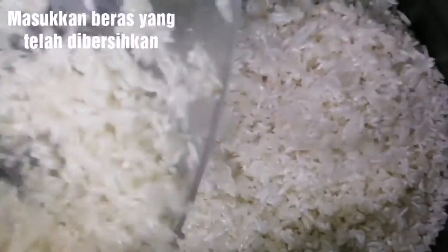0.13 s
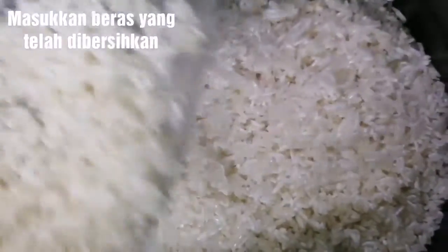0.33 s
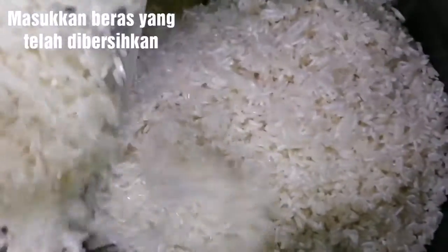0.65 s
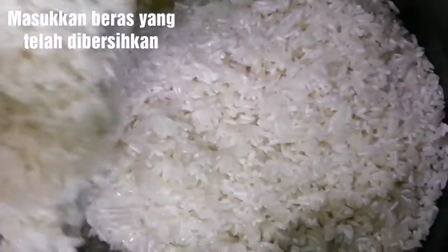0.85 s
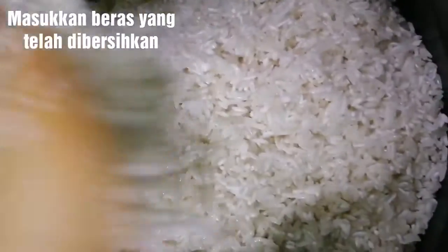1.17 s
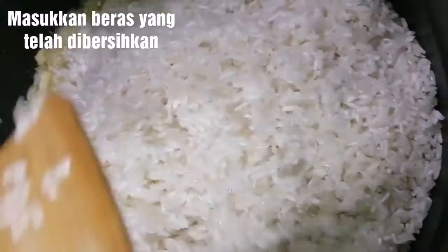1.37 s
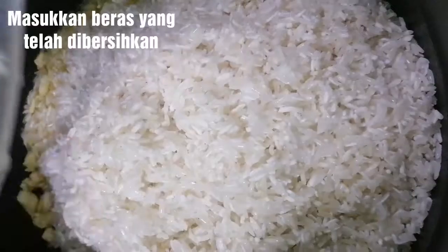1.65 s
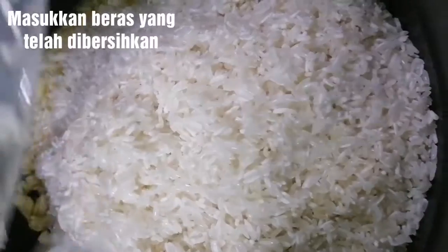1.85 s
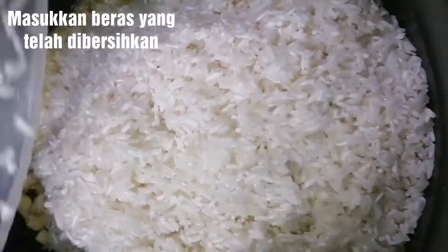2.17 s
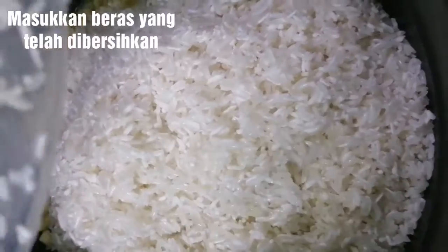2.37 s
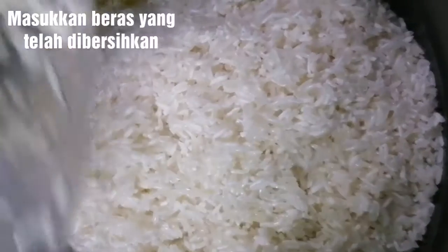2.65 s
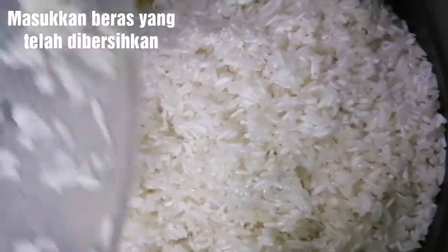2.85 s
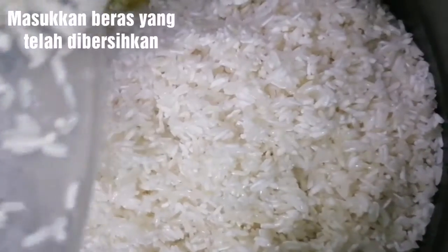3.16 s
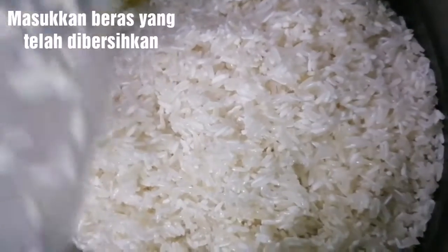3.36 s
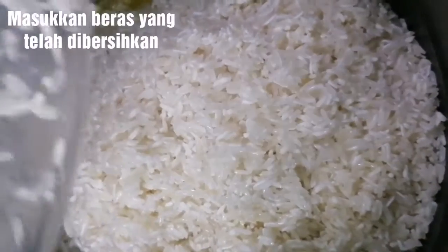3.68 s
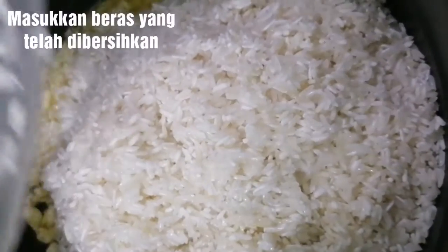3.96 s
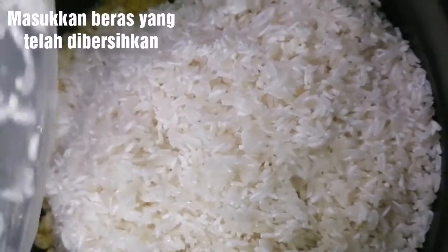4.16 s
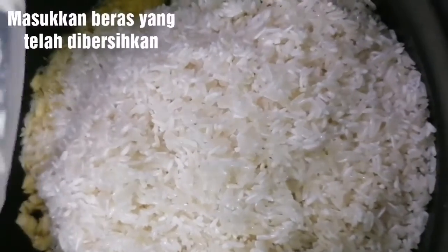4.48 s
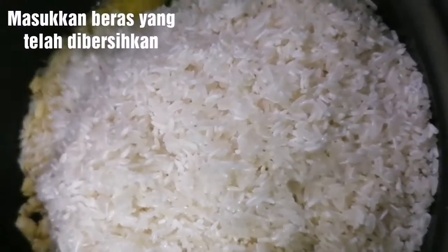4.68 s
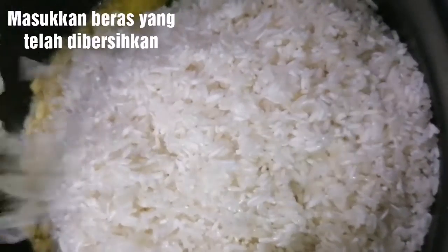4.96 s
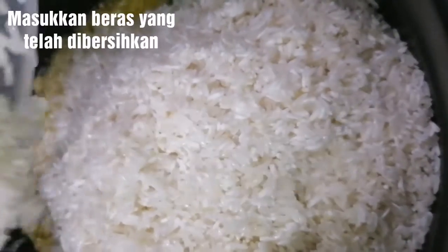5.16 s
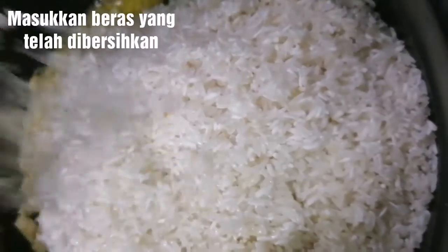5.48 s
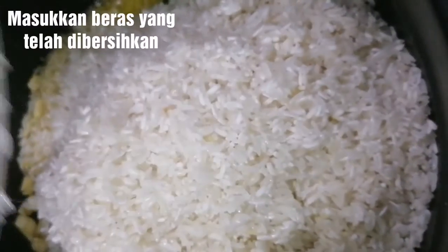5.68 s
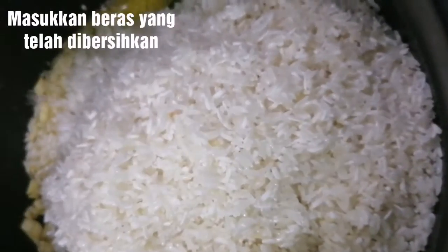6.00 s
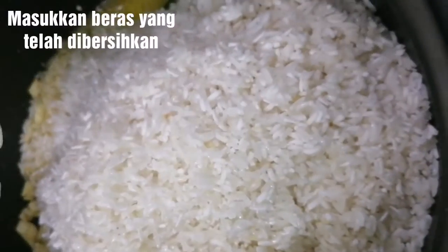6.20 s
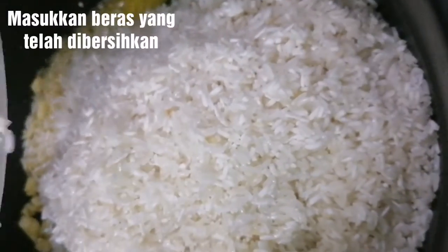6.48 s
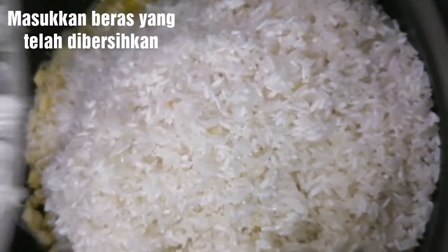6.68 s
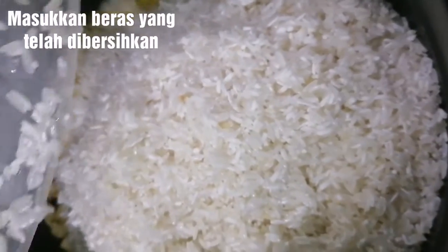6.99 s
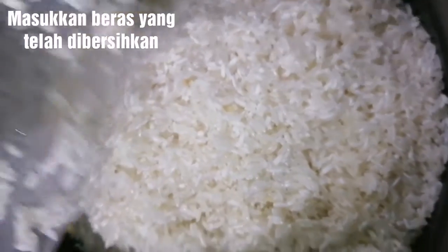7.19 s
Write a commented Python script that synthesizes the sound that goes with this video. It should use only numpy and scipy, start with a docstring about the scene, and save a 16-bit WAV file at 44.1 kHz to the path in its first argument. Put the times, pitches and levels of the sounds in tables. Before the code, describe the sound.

Very close stereo pickup in a small kitchen. Rice is pushed from a plastic container into a pot in short hissing showers, densest in the first second and a half and again around three to four seconds. A wooden paddle knocks the hollow plastic throughout, with dull thuds, crunching grains and sharp single ticks. A faint low hum sits underneath.

```python
"""In a small kitchen with a faint hum, rice is pushed from a plastic container into a pot, close to a phone.
Each push is a shower of grain clicks that swells and ebbs: hiss on the heap, rasp and drumming on plastic.
Stray grains and snapping creases tick as short bursts; the wooden paddle skids through grains and squeaks.
Its knocks ring decaying modes of container and paddle, crunch grains, and make the load thud, slump and spill."""
import sys
import numpy as np
from scipy import signal
from scipy.fft import rfft, irfft
from scipy.io import wavfile

SR = 44100
rng = np.random.default_rng(int(sys.argv[2]) if len(sys.argv) > 2 else 0)


def log_audio(samples):
    """Write samples as a 16-bit WAV file to the path given in sys.argv[1]."""
    # one column per channel
    frames = np.atleast_2d(samples).T
    # limit to full scale, then quantise
    limited = np.clip(frames, -1, 1)
    pcm = np.round(limited * 32767).astype(np.int16)
    wavfile.write(sys.argv[1], SR, pcm)


N = 323694
TIME = np.arange(N) / SR


def undb(db):
    """Decibels to amplitude."""
    return 10 ** (np.asarray(db) / 20)


def unit(x):
    """Scale to an rms of 1."""
    return x / np.sqrt(np.mean(x ** 2))


def gains(points, size):
    """Amplitude at each FFT bin, interpolated from (freq_hz, gain_db) over log frequency."""
    hz, db = np.transpose(points)
    bins_hz = np.arange(size // 2 + 1) * SR / size
    return undb(np.interp(np.log(bins_hz + 1), np.log(hz), db))


def colour(x, points, size=1024):
    """Causal minimum-phase filter of unit energy, shaped by (freq_hz, gain_db)."""
    cepstrum = irfft(np.log(gains(points, size)))
    cepstrum[1:size // 2] *= 2
    cepstrum[size // 2 + 1:] = 0
    response = irfft(np.exp(rfft(cepstrum)))
    response = response / np.linalg.norm(response)
    return signal.oaconvolve(x, response[None], axes=1)[:, :N]


def cut(x, hz, kind, order=4):
    """Butterworth filter."""
    return signal.sosfilt(signal.butter(order, hz, kind, fs=SR, output="sos"), x)


def fade(t60_s, size):
    """Exponential decay, 60 dB down after t60_s."""
    return np.exp(-np.log(1000) * TIME[:size] / t60_s)


def surge(rise_s, size):
    """Pulse that peaks at 1 after rise_s, then decays."""
    t = TIME[:size] / rise_s
    return t * np.exp(1 - t)


def add(out, s, sound):
    """Lay a sound into the track at time s."""
    i = max(int(s * SR), 0)
    out[:, i:i + sound.shape[1]] += sound[:, :N - i]


def wander(hz):
    """Random fluctuation of rms 1: noise low-passed at hz."""
    return unit(cut(rng.standard_normal(N), hz, "low", order=2))


def ports(x, lag_samples):
    """The right port hears the sound lag_samples after the left."""
    return np.array([x, np.pad(x, (lag_samples, 0))[:len(x)]])


def click(t60_s, shared, scatter_t60_s=0.032, tone=1.46, size=1024):
    """One contact: a faintly pitched snap, left port first, plus diffuse scatter off the pot wall."""
    ping = np.sin(2 * np.pi * rng.uniform(1600, 11000) * TIME[:size])
    snap = unit((rng.standard_normal(size) + tone * unit(ping)) * fade(t60_s, size))
    lag_samples = int(rng.uniform(13, 23))
    scatter = unit(rng.standard_normal((2, size)) * fade(scatter_t60_s, size))
    # shared: power fraction of the snap
    mix = np.sqrt(shared) * ports(snap, lag_samples) + np.sqrt(1 - shared) * scatter
    return mix / np.sqrt(size)


def patter(per_s, spread_db, shared=0.74, count=24, scatter_t60_s=0.027):
    """Random impacts of count kinds; rate does not set power, positive spread makes a few much harder."""
    out = 0
    for _ in range(count):
        chance, strength = rng.random((2, N))
        force = undb(-spread_db * np.log(0.033 + strength)) / np.sqrt(per_s)
        hits = (chance < per_s / count / SR) * force
        out = out + signal.oaconvolve(hits[None], click(0.0014, shared, scatter_t60_s), axes=1)[:, :N]
    return unit(out)


def ring(modes, stretch, detune=0.028, uneven_db=7.5, size=8192):
    """Decaying modes, peak 1; every contact point shifts and weights the weaker ones anew."""
    out, top_db = 0, max(db for _, _, db in modes)
    for hz, t60_s, db in modes:
        shift, weight = rng.standard_normal(2) * (db < top_db)
        phase = 2 * np.pi * hz * stretch * (1 + detune * shift) * TIME[:size]
        out = out + undb(db + uneven_db * weight) * fade(t60_s, size) * np.sin(phase)
    return out / np.abs(out).max()


# kitchen noise colour: freq_hz, gain_db (relative)
KITCHEN_COLOUR = [(25, -14), (42, 1), (50, 5), (62, -4), (115, 1.5), (147, 1), (185, -5.5), (300, -10.5),
                  (700, -11.5), (1500, -14), (3000, -20), (5000, -25.5), (9000, -22), (16000, -34)]
# kitchen hum lines: mean_pitch_hz, level_db (rms once grown, before waver)
HUM_LINES = [(48.4, -61.5), (145.3, -63)]


def kitchen(floor_db=-59, apart=0.49, waver_db=2, swell_db=6, hum_drift=0.01426, hum_waver_db=3.5):
    """Wavering hum and a low drone common to both ports, growing midway, with thin separate hiss."""
    noise = rng.standard_normal((3, N))
    growth_db = np.interp(TIME, [3.2, 3.7], [-swell_db, 0])
    drone = cut(noise[0], 170, "low", order=1) * undb(waver_db * wander(7.3) + growth_db)
    hiss = apart * noise[1:]
    air = unit(irfft(rfft(drone + hiss) * gains(KITCHEN_COLOUR, N), N))
    hum = 0
    for hz, db in HUM_LINES:
        level = undb(db + growth_db + hum_waver_db * wander(3.3)) * np.sqrt(2)
        pitch_hz = hz * (1 + hum_drift * wander(3.3))
        hum = hum + level * np.sin(2 * np.pi * np.cumsum(pitch_hz) / SR)
    return undb(floor_db) * air + hum


SHOWER_DEPTH_DB, SHOWER_ROUND = 20.5, 1.2  # drop one swell or ebb from the peak; higher exponent rounds crest


def shower(peak_s, swell_s, ebb_s):
    """Flow of one shower: the rice gathers speed, crests and runs out."""
    away = np.maximum((peak_s - TIME) / swell_s, (TIME - peak_s) / ebb_s)
    flow, near = np.zeros(N), away < 3
    flow[near] = undb(-SHOWER_DEPTH_DB * away[near] ** SHOWER_ROUND)
    return flow


# rice over the rim at each push: peak_s, swell_s, ebb_s, hiss_db, rasp_db, drum_db (relative)
SHOWERS = [(0.21, 0.1, 0.12, -36, -40.5, -43), (0.561, 0.02, 0.06, -32.5, -34, -49.5),
           (0.841, 0.077, 1, -47, -70, -48), (0.992, 0.096, 0.07, -35.5, -42.5, -44),
           (1.221, 0.14, 0.46, -45, -47.5, -54), (1.32, 0.062, 0.12, -36.5, -58, -65),
           (1.941, 0.029, 0.21, -45, -50, -53), (2.099, 0.18, 0.087, -42.5, -43.5, -58),
           (2.29, 0.46, 0.12, -50.5, -61, -85.5), (2.482, 0.05, 0.14, -41, -50.5, -46),
           (2.56, 0.1, 1, -52.5, -60, -76), (2.811, 0.12, 0.041, -54, -76, -47.5),
           (3.178, 0.098, 0.12, -37, -41, -47), (3.497, 0.081, 0.15, -34.5, -40, -40),
           (3.679, 0.073, 0.11, -49, -47, -69), (3.916, 0.013, 0.089, -32.5, -49, -39.5),
           (3.983, 0.11, 0.057, -36, -37.5, -42), (4.248, 0.041, 0.2, -40, -48, -42.5),
           (4.37, 0.09, 0.051, -46, -50, -53), (4.571, 0.049, 0.019, -48, -50.5, -55),
           (4.759, 0.33, 0.28, -50, -55.5, -52), (4.986, 0.076, 0.13, -44, -49.5, -61),
           (5.362, 0.059, 0.047, -43.5, -50.5, -38), (5.488, 0.13, 0.1, -41, -43, -49.5),
           (5.721, 0.2, 0.079, -50.5, -77, -89), (5.858, 0.0076, 0.023, -42.5, -37, -58.5),
           (5.999, 0.14, 0.092, -41.5, -44, -55.5), (6.235, 0.036, 0.099, -44.5, -45, -64),
           (6.426, 0.1, 0.11, -39.5, -43.5, -66), (6.678, 0.051, 0.25, -45, -49, -87),
           (7.041, 0.13, 0.088, -48, -54.5, -67), (7.27, 0.11, 0.094, -52, -62, -57)]
# heap settling between pushes: hiss_db, rasp_db, drum_db (relative)
SETTLING_DB = (-73, -77.5, -77.5)
# spill shaken loose by a knock, against its high clack: hiss_db, rasp_db, drum_db
SPILL_DB = (-13, -18.5, -27)
SPILL_LAG_S, SPILL_SWELL_S, SPILL_EBB_S = 0.012, 0.004, 0.052


def flows():
    """Strength of hiss, rasp and drumming: showers, spills and settling add up in power."""
    power = np.outer(undb(SETTLING_DB) ** 2, np.ones(N))
    for peak_s, swell_s, ebb_s, *levels_db in SHOWERS:
        power += np.outer(undb(levels_db) ** 2, shower(peak_s, swell_s, ebb_s) ** 2)
    spills = np.zeros(N)
    for s, *_, clack_db in KNOCKS:
        spill = shower(s + SPILL_LAG_S, SPILL_SWELL_S, SPILL_EBB_S)
        spills += (undb(clack_db) * spill) ** 2
    return np.sqrt(power + np.outer(undb(SPILL_DB) ** 2, spills))


# grain click colour: freq_hz, gain_db (relative)
GRAIN_COLOUR = [(300, -21), (800, -6), (1250, -3), (1500, -3.5), (1800, 6), (2400, 2), (3100, 7.5),
                (3950, -5.5), (5000, 3.5), (5800, 5), (7500, -0.5), (8900, 6.5), (11000, -2), (13000, -5),
                (15700, -12.5)]
# drummed container wall colour: freq_hz, gain_db (relative)
WALL_COLOUR = [(40, -50), (220, -9), (370, -7), (480, -8.5), (600, 5.5), (720, -4.5), (950, -13.5),
               (1220, -2.5), (1500, -20), (1780, -16), (2200, -34), (3000, -39.5)]


def stream(hiss_db=0, rasp_db=1, drum_db=0, split_hz=4200, trickle_per_s=550, rush_per_s=5500):
    """Grains fall on the heap, rasp along the plastic and set its wall drumming."""
    hiss, rasp, drum = flows()
    # a thin trickle ticks grain by grain; a full rush merges into a hiss
    per_s = trickle_per_s + rush_per_s * hiss / hiss.max()

    def grains():
        hits = patter(per_s / 2, spread_db=8.0, shared=0.13, count=18, scatter_t60_s=0.035)
        return colour(hits, GRAIN_COLOUR)

    # square hits sound in both ranges, glancing ones only bright, those on plastic only dull
    square, glancing, soft = grains(), grains(), grains()
    bright = unit(cut(square + 0.58 * glancing, split_hz, "high"))
    dull = unit(cut(square + 1.9 * soft, split_hz, "low"))
    # whole clumps bump the wall
    wall = unit(colour(patter(per_s=900, spread_db=3.5, shared=0.64, count=6), WALL_COLOUR))
    return undb(hiss_db) * hiss * bright + undb(rasp_db) * rasp * dull + undb(drum_db) * drum * wall


def clumping(clump_db=0.87, clump_hz=55):
    """Rice leaves the rim in clumps, so the flow flutters quickly."""
    return undb(clump_db * wander(clump_hz))


def strays(stray_db=-23, per_s=18, follow=0.35):
    """Grains bounce clear of the stream and tick on their own, harder when the flow is strong."""
    hiss = flows()[0]
    hits = colour(patter(per_s, spread_db=6, shared=0.96, count=12), GRAIN_COLOUR)
    chatter = unit(cut(hits, 2100, "high", order=2))
    return undb(stray_db) * hiss.max() * (hiss / hiss.max()) ** follow * chatter


# single grains and creases snapping: start_s, top_treble_db, lower_treble_db (relative)
TICKS = [(0.0227, -36.5, -44.5), (0.062, -30.5, -33.5), (0.2827, -40, -43), (0.3222, -38, -36),
         (0.4706, -34, -37), (0.6235, -44, -42), (0.685, -41, -41.5), (0.708, -34, -42),
         (1.061, -32.5, -39), (1.091, -39, -33.5), (1.602, -39.5, -47.5), (1.634, -36, -48),
         (1.695, -45.5, -62), (1.957, -34.5, -38), (1.9965, -33, -64), (2.0227, -37, -55),
         (2.059, -31.5, -37.5), (2.147, -32.5, -46), (2.552, -31, -33.5), (2.5778, -33, -35.5),
         (2.812, -40, -53), (3.174, -39, -33), (3.184, -39, -56),  (3.375, -41, -44), (3.407, -36.5, -36),
         (3.5546, -30, -67), (3.6157, -37.5, -64), (3.639, -38, -63), (3.672, -38, -46),
         (3.7214, -41.5, -43), (3.8187, -35.5, -40), (3.895, -32, -34), (4.154, -46.5, -42.5),
         (4.291, -29, -37), (4.363, -30, -39.5), (4.3958, -37, -40), (4.624, -37.5, -36), (4.68, -36, -60),
         (5.102, -46.5, -67), (5.169, -42, -54), (5.339, -36, -60), (5.362, -29, -58), (5.749, -36, -38),
         (6.061, -34, -41), (6.109, -41.5, -54.5), (6.162, -37, -40.5), (6.548, -44.5, -46),
         (6.629, -40.5, -30.5), (6.709, -33, -41), (6.7684, -44, -58), (6.8035, -39.5, -50),
         (6.8559, -41, -60), (6.8839, -39, -31), (7.0167, -41, -42.5), (7.173, -37.5, -70)]


def ticks(top_gain_db=23, lower_gain_db=25, split_hz=4200, bounce_db=-6):
    """Sharp single contacts, each a noisy decaying click with a weaker rebound."""
    bright, dull = np.zeros((2, 2, N))
    for s, top_db, lower_db in TICKS:
        rebound_s = rng.uniform(0.00061, 0.006)
        for delay_s, drop_db in ((0, 0), (rebound_s, bounce_db)):
            sound = click(0.012, 0.35, scatter_t60_s=0.016, tone=0.7) * undb(drop_db)
            add(bright, s + delay_s, sound * undb(top_db + top_gain_db))
            add(dull, s + delay_s, sound * undb(lower_db + lower_gain_db))
    top = cut(colour(bright, GRAIN_COLOUR), split_hz, "high")
    return top + cut(colour(dull, GRAIN_COLOUR), split_hz, "low")


# paddle modes: pitch_hz, t60_s, level_db (nominal, relative)
PADDLE_MODES = [(1231, 0.027, 0), (1784, 0.016, 24), (1950, 0.018, -11), (2500, 0.042, 8),
                (2790, 0.013, 6.5), (3010, 0.06, -7)]
# bounds of the low, middle and high clack: edge_hz
CLACK_EDGES_HZ = (900, 1480, 2250, 3600)


def struck_paddle(levels_db):
    """The point of contact decides how hard the paddle's low, middle and high modes ring."""
    out = 0
    for db, low_hz, high_hz in zip(levels_db, CLACK_EDGES_HZ, CLACK_EDGES_HZ[1:]):
        modes = [mode for mode in PADDLE_MODES if low_hz < mode[0] < high_hz]
        stretch = 1 + 0.0051 * rng.standard_normal()
        out = out + undb(db) * unit(ring(modes, stretch, detune=0.027, uneven_db=14))
    return out


# paddle against container: start_s, ring_db, ring_pitch_hz, thud_db, thud_pitch_hz,
# low_clack_db, middle_clack_db, high_clack_db (levels relative)
KNOCKS = [(0.057, -35.5, 575, -48.5, 134, -44, -61, -35), (0.483, -31, 573, -58, 240, -42, -37, -33.5),
          (0.795, -24, 560, -66, 423, -65, -68.5, -45.5), (0.806, -26, 580, -23.5, 385, -64, -68, -44),
          (0.921, -50, 590, -33.5, 97, -66, -73, -69), (1.016, -57.5, 586, -39.5, 348, -53, -58, -52),
          (1.308, -41, 583, -40, 224, -47, -41, -40), (1.373, -31.5, 635, -31, 156, -52, -54, -56),
          (1.381, -38, 567, -31.5, 137, -52, -47, -50), (1.883, -24.5, 603, -26.5, 170, -39, -40, -25),
          (1.947, -34.5, 628, -41, 288, -43, -40, -45), (2.342, -21.5, 616, -35, 190, -41, -62, -42.5),
          (2.435, -25.5, 583, -28.5, 346, -35.5, -30, -45.5), (2.514, -50.5, 610, -36, 119, -69, -67, -60),
          (2.996, -25, 577, -30, 261, -63, -52, -38.5), (3.007, -14.5, 595, -23.5, 290, -23.5, -22, -30.5),
          (3.091, -34.5, 654, -37, 363, -55, -69, -58), (3.392, -27.5, 517, -27.5, 338, -47, -41, -39),
          (3.416, -22, 585, -24.5, 264, -41.5, -51, -36), (3.818, -33, 620, -43, 159, -57, -49, -40.5),
          (3.905, -29.5, 575, -65, 300, -56, -58, -45), (3.958, -32.5, 606, -35.5, 360, -42, -33, -47),
          (4.209, -23, 618, -26.5, 227, -34, -39, -53), (4.231, -35, 607, -22.5, 151, -50, -55, -61),
          (4.254, -37, 635, -35, 230, -55, -45, -51), (4.296, -13, 602, -29, 217, -55, -37, -39.5),
          (4.302, -18.5, 580, -22.5, 186, -59, -48, -48), (4.494, -26, 538, -20, 143, -78, -76, -49),
          (4.568, -31, 597, -29, 333, -41.5, -59, -63), (4.698, -26, 598, -27, 148, -35.5, -41, -41),
          (5.247, -21, 620, -26.5, 189, -49, -49, -43), (5.371, -23, 615, -34, 298, -25.5, -38, -35.5),
          (5.837, -25, 596, -26.5, 389, -64.5, -65, -63), (5.842, -49, 570, -26, 116, -64, -63, -50),
          (5.854, -31, 565, -39, 272, -63, -33, -36.5), (6.23, -27.5, 605, -30, 148, -46, -37, -31.5),
          (6.308, -29.5, 601, -39, 170, -65, -30, -32), (6.631, -27, 620, -36.5, 106, -57, -40.5, -34.5),
          (6.883, -27, 610, -28.5, 178, -34.5, -47, -36.5),
          (6.932, -30.5, 552, -28.5, 118, -47.5, -41, -30.5),
          (7.222, -50, 596, -39.5, 117, -66, -37.5, -45.5),
          (7.269, -42.5, 580, -42, 257, -60.5, -63.5, -55), (7.287, -34, 642, -39, 181, -43.5, -48, -50)]
# container modes: pitch_hz, t60_s, level_db (nominal, relative)
TUB_MODES = [(257, 0.096, -21), (383, 0.063, -14.5), (611, 0.041, 3), (635, 0.11, -24), (675, 0.091, -33),
             (1164, 0.026, -18)]
# crushed grain colour: freq_hz, gain_db (relative)
CRUNCH_COLOUR = [(100, -20.5), (800, -23), (1500, -10), (3000, -14), (4000, -20), (6000, -18),
                 (9000, -11.5), (15000, -25)]


def knocks(ring_gain_db=6, thud_gain_db=12.5, clack_gain_db=-17.0, crunch_gain_db=-3,
           thud_t60_s=0.019, press_s=0.0015, crunch_s=0.0035, size=8192):
    """Wood meets plastic: trapped grains crunch, paddle and container ring, the load of rice thuds."""
    body, clacks = np.zeros((2, 2, N))
    crush, t = np.zeros((1, N)), TIME[:size]
    main_hz = max(TUB_MODES, key=lambda mode: mode[2])[0]
    for s, ring_db, pitch_hz, thud_db, thud_hz, *clack_db in KNOCKS:
        tub = undb(ring_db + ring_gain_db) * ring(TUB_MODES, pitch_hz / main_hz, uneven_db=8)
        thud = fade(thud_t60_s, size) * np.sin(2 * np.pi * thud_hz * t)
        sound = tub + undb(thud_db + thud_gain_db) * thud
        contact = 1 - np.exp(-t / press_s)
        add(body, s, -ports(sound * contact, lag_samples=12))
        add(clacks, s, undb(clack_gain_db) * ports(struck_paddle(clack_db), lag_samples=10))
        # grains start to give way just before the wall is reached
        crush_level = undb(clack_db[-1] + crunch_gain_db)
        add(crush, s - crunch_s / 2, crush_level * surge(crunch_s, size)[None])
    cracks = patter(per_s=12000, spread_db=5.5, shared=1.0, count=6)
    return cut(body, 60.0, "high", order=2) + clacks + colour(crush * cracks, CRUNCH_COLOUR)


# slumping load colour: freq_hz, gain_db (relative)
SLUMP_COLOUR = [(50, 1), (150, 9), (280, 0), (450, 4), (600, -12), (850, -35), (1180, -23), (1600, -23),
                (4000, -59)]


def slumps(slump_db=-22, thud_share=0.88, lag_s=0.0087, rise_s=0.011, size=8192):
    """Jolted by a knock, the load of rice falls back against the wall in loose bumps."""
    push = np.zeros((1, N))
    for s, ring_db, _, thud_db, *_ in KNOCKS:
        jolt_db = (1 - thud_share) * ring_db + thud_share * thud_db
        add(push, s + lag_s, undb(jolt_db + slump_db) * surge(rise_s, size)[None])
    # negative spread: most bumps are strong, a few weak
    bumps = patter(per_s=720, spread_db=-5.5, shared=0.71, count=6)
    return colour(push * bumps, SLUMP_COLOUR)


# paddle skidding through dry rice: start_s, length_s, level_db (relative)
SKIDS = [(0.716, 0.029, -36.5), (0.747, 0.062, -39), (1.418, 0.05, -29), (1.45, 0.031, -30.5),
         (1.479, 0.028, -41), (2.251, 0.035, -38)]
# skid colour: freq_hz, gain_db (relative)
SKID_COLOUR = [(1500, -31.5), (3000, -29), (5000, -20), (5800, -18), (6300, -8.5), (7300, -11.5),
               (8700, -15), (11000, -16.5), (15000, -26.5)]
SQUEAK_HZ, SQUEAK_T60_S = 5800, 0.071


def skids(skid_db=1, rise=0.27, squeak_db=-13):
    """Grains chatter very fast under the paddle: a bright rasp drives a thin squeak that rings on."""
    push = 0
    for s, length_s, db in SKIDS:
        bite = np.interp(TIME, [s, s + rise * length_s, s + length_s], [0, 1, 0])
        push = push + undb(db + skid_db) * bite
    rasp = push * unit(colour(patter(per_s=7800, spread_db=5.5, count=6), SKID_COLOUR))
    resonance = ring([(SQUEAK_HZ, SQUEAK_T60_S, 0)], 1)
    squeak = signal.oaconvolve(rasp, resonance[None], axes=1)[:, :N]
    return rasp + undb(squeak_db) * rasp.std() * unit(squeak)


def room(x, wet_db=-18, t60_s=0.18, onset_t60_s=0.037, size=22050):
    """Faint diffuse reflections of the kitchen: convolution with noise that builds up and decays."""
    tail = rng.standard_normal((2, size)) * fade(t60_s, size) * (1 - fade(onset_t60_s, size))
    return x + undb(wet_db) * signal.oaconvolve(x, unit(tail) / np.sqrt(size), axes=1)[:, :N]


# left port nearer the pot, with its own peak: freq_hz, left_minus_right_db
PORT_BALANCE = [(60, 8), (200, 11), (600, 11.5), (1250, 3.5), (2000, 2.5), (4400, 0), (6200, -1),
                (8700, 14), (11000, 3), (15000, 3.5)]


def balance(near):
    """Split the two ports' levels by frequency; their gains sum to 2."""
    ratio = gains(PORT_BALANCE, N)
    sides = np.array([ratio, np.ones_like(ratio)]) * 2 / (1 + ratio)
    return irfft(rfft(near) * sides, N)


def scene():
    """Rice, paddle and container close to the two ports, over the kitchen's drone."""
    pour = stream() * clumping()
    contacts = strays() + ticks() + knocks() + slumps() + skids()
    return balance(room(pour + contacts)) + kitchen()


TOP_HZ = 16000


def record(dry):
    """The phone thins the deepest bass and cuts the top."""
    thinned = cut(dry, 30, "high", order=2)
    return signal.sosfilt(signal.ellip(10, .2, 80, TOP_HZ, fs=SR, output="sos"), thinned)


dry = scene()
out = record(dry)
log_audio(out)
```